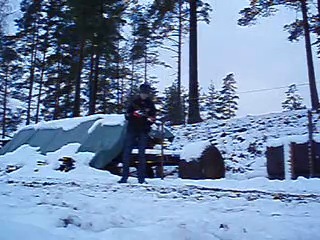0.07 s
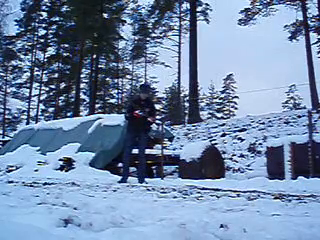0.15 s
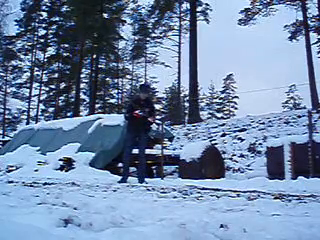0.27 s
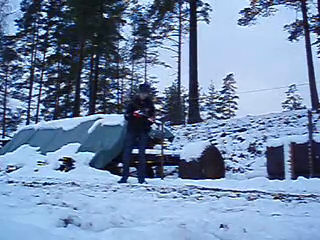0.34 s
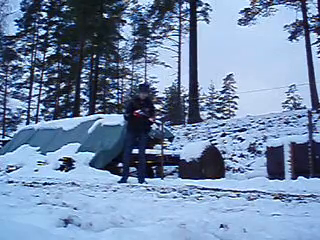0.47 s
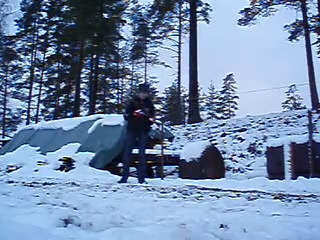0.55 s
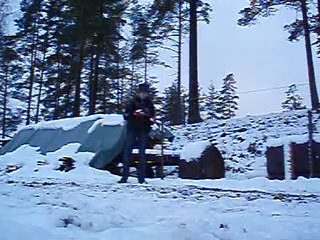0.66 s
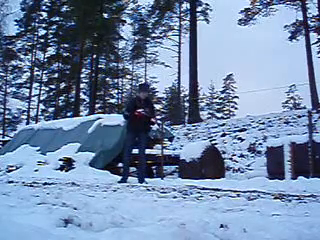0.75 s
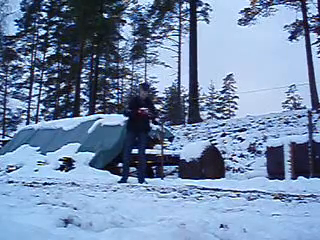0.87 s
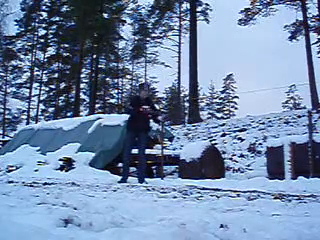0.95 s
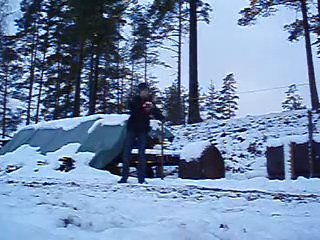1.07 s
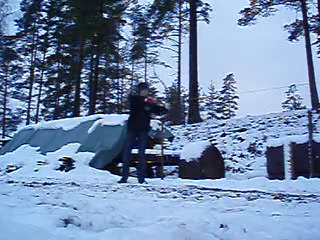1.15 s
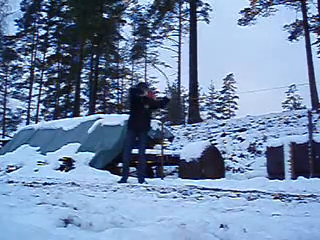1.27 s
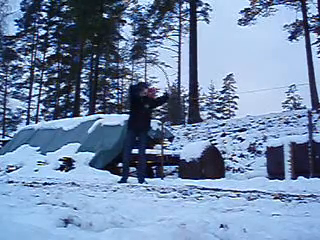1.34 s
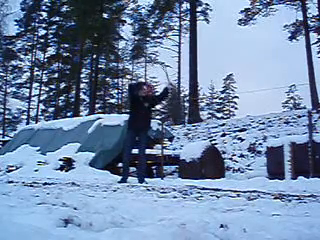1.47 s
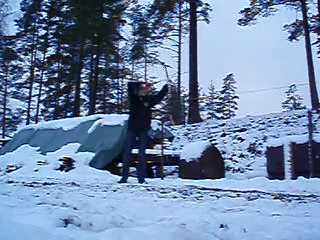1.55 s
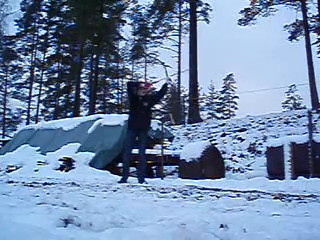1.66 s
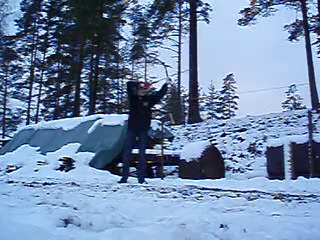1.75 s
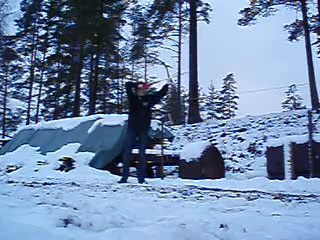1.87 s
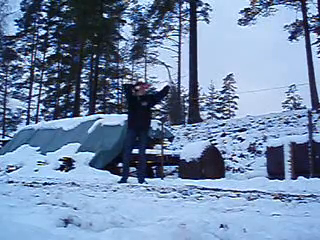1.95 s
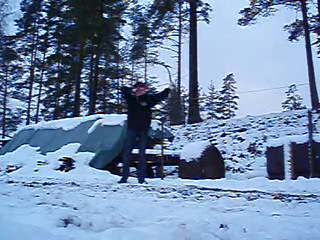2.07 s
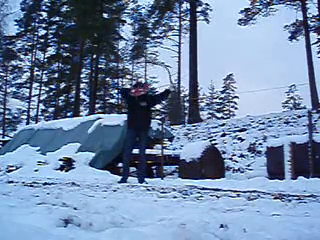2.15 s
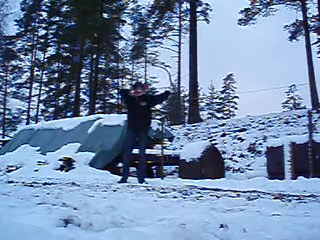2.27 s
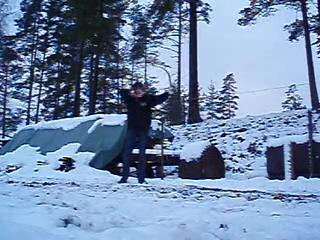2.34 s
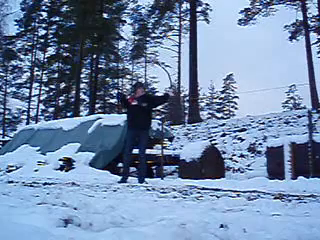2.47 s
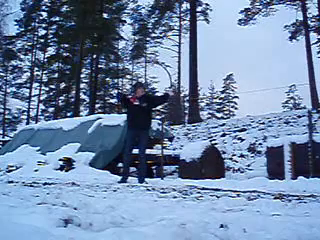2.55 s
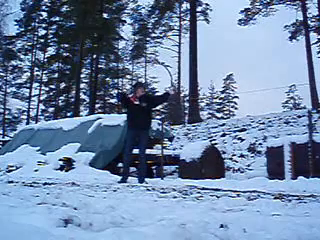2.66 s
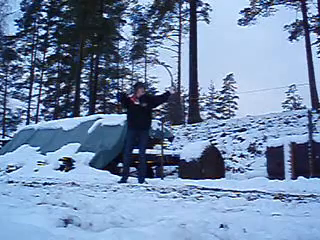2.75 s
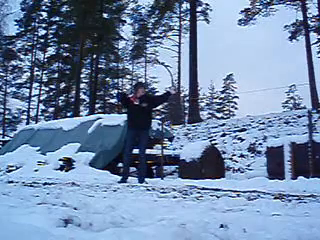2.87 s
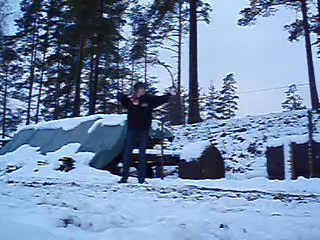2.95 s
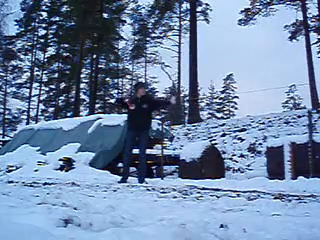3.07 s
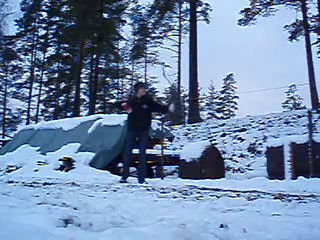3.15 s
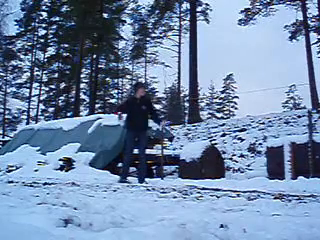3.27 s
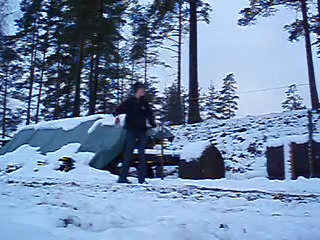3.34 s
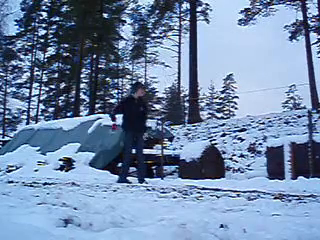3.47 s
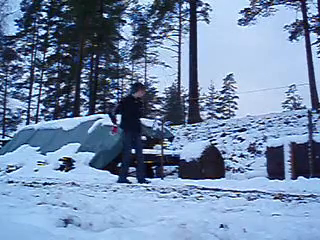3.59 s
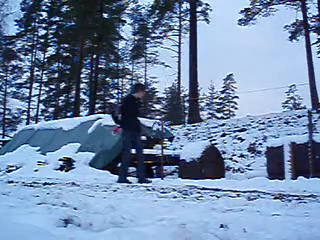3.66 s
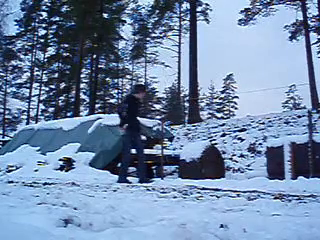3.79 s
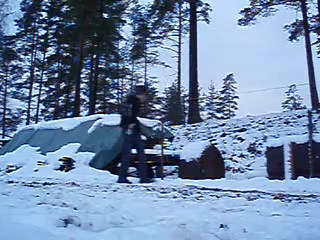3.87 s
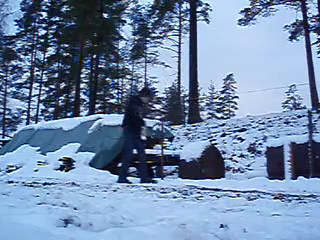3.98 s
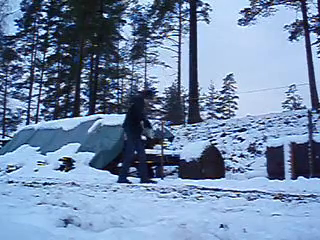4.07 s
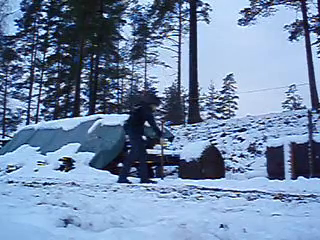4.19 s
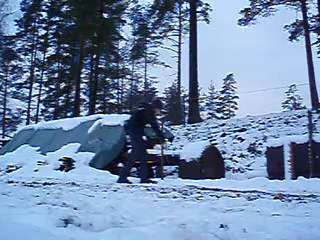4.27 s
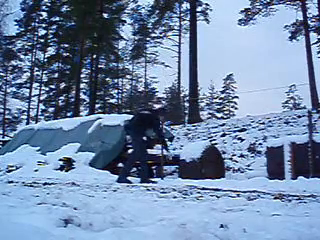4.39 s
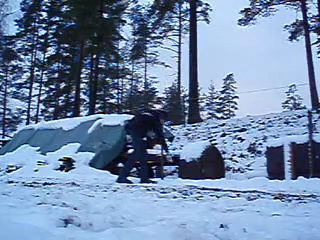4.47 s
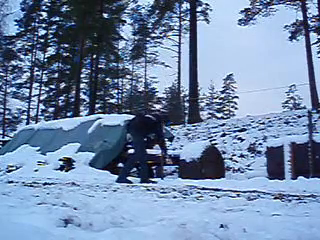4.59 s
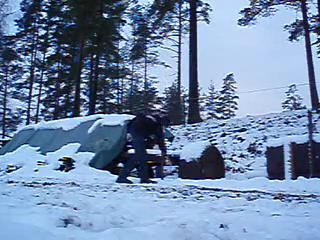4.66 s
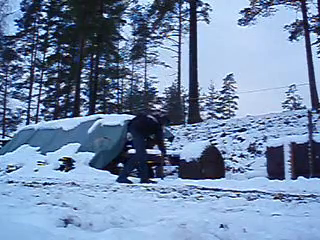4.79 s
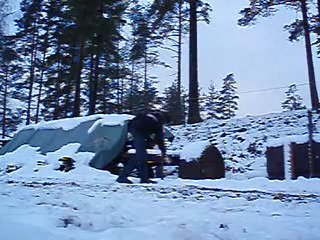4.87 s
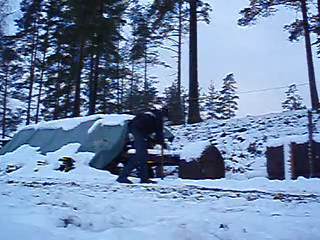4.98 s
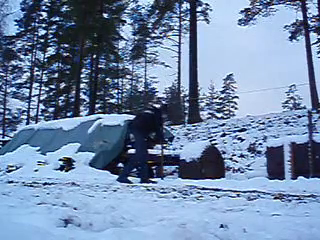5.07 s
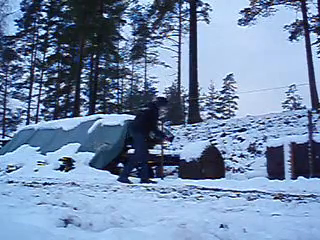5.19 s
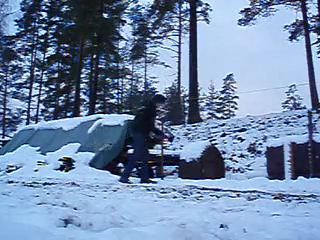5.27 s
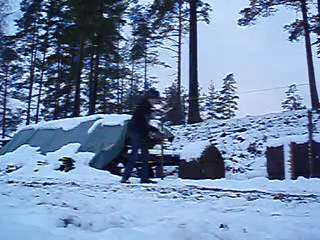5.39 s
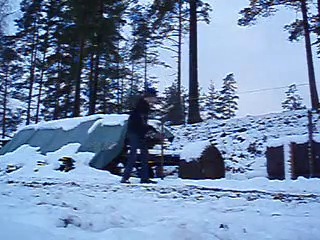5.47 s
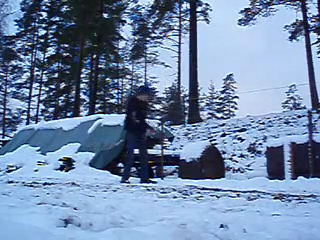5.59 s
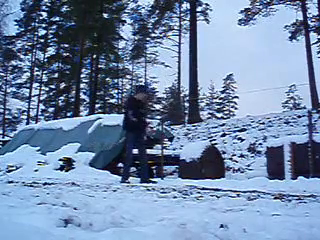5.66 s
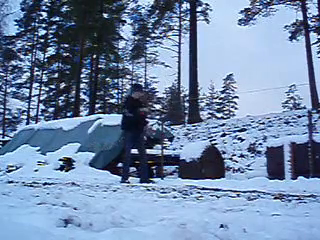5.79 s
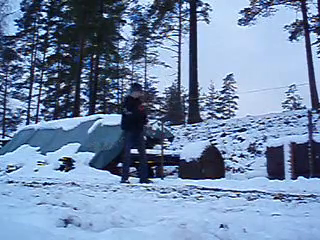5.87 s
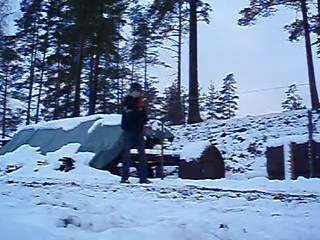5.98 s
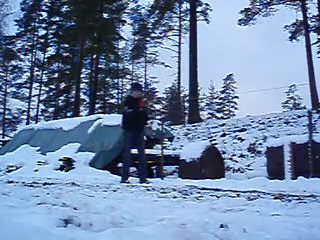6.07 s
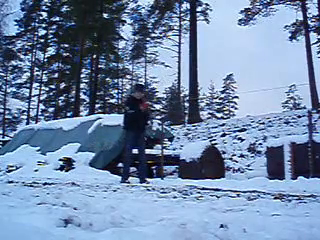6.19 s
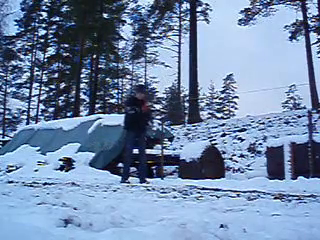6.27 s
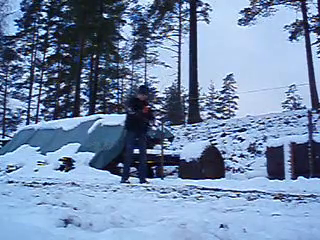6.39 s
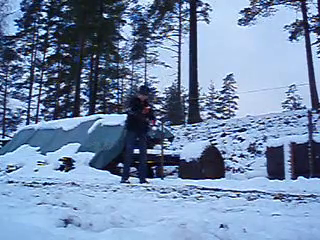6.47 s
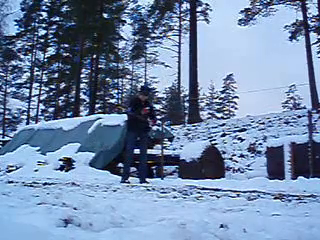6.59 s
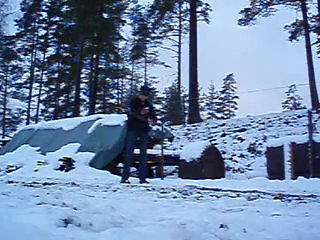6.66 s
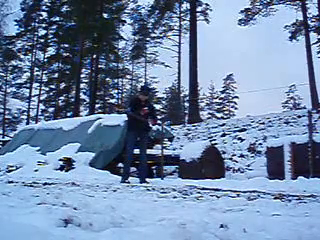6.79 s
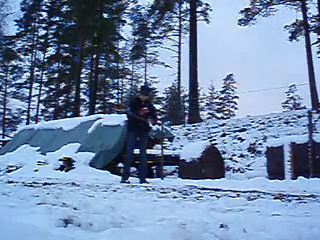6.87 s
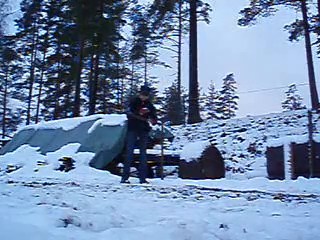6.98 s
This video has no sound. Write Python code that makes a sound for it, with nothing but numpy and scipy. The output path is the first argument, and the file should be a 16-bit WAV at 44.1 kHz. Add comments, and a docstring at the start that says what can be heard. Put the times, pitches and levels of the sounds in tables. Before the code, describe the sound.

Outdoor archery shot: bright string slap with short fluttering hum, a solid thud half a second later, then scattered muted handling knocks over grainy hiss.

```python
"""An archer shoots one arrow in a snowy forest clearing: the bow slaps, rings and hums, the arrow thuds home.
Bow, knocking gear and target are damped sine waves; scrapes, buzz and air are coloured noise.
Wind buffets a small camera, as lumpy low noise and single pushes; trees, a shed and a slope send echoes.
The camera keeps 8000 samples a second in 8 bits, which makes a steady grainy hiss and mirrors the treble."""
import sys
import numpy as np
from scipy import signal
from scipy.fft import rfft, irfft
from scipy.io import wavfile

SR = 44100
rng = np.random.default_rng(int(sys.argv[2]) if len(sys.argv) > 2 else 0)


def transcribe(u):
    """Save the signal u as a 16-bit wav file named by the first command-line argument.

    u: samples, shape (n,) or (channels, n), limited to [-1, 1]; the rate is SR.
    q: integer samples, one column per channel.
    """
    v = np.clip(np.atleast_2d(u).T, -1, 1)
    q = np.round(v * 32767).astype(np.int16)
    wavfile.write(sys.argv[1], SR, q)


N = 310002  # length in samples


def amp(db):
    """Decibels to amplitude factor."""
    return 10 ** (np.asarray(db) / 20)


def read(points, hz):
    """Read a curve of (frequency, value) points along a logarithmic frequency axis."""
    f, value = np.transpose(points)
    return np.interp(np.log(hz + 1), np.log(f + 1), value)


def add(mix, s, sound):
    """Lay a sound into the mix at s seconds, cut off at the end."""
    part = mix[round(s * SR):][:len(sound)]
    part += sound[:len(part)]


def lowpass(x, order, hz):
    """Butterworth treble cut."""
    return signal.sosfilt(signal.butter(order, hz, fs=SR, output="sos"), x)


def noise(colour):
    """Noise of rms 1 with the given spectrum, falling away towards 6 kHz."""
    level_db = read(colour + [(6000, -86)], np.fft.rfftfreq(N, 1 / SR))
    x = irfft(rfft(rng.standard_normal(N)) * amp(level_db), N)
    return x / x.std()


def blows(rows, glide_share=.6, rise_share=.3):
    """Damped waves with a soft start; the pitch slides from the first value towards the last."""
    out = np.zeros(N)
    for s, db, first_hz, last_hz, ring_ms in rows:
        u = np.arange(round(SR * ring_ms / 125)) / SR * 1000 / ring_ms  # time in ring lengths, up to 8
        hz = last_hz + (first_hz - last_hz) * np.exp(-u / glide_share)
        shape = (1 - np.exp(-u / rise_share)) * np.exp(-u)
        wave = np.sin(2 * np.pi * np.cumsum(hz) / SR)
        add(out, s, amp(db) * shape / shape.max() * wave)
    return out


def ticks(rows, rise_share=.22):
    """Short blows of steady pitch."""
    return blows([(s, db, hz, hz, ms) for s, db, hz, ms in rows], rise_share=rise_share)


# spectrum of the background air: (frequency [Hz], relative level [dB per Hz])
AIR_COLOUR = [(20, -5.5), (60, -0.5), (150, 0), (300, -6), (600, -8.5), (1200, -13.5), (2500, -15.5),
              (4000, -16)]
AIR_DB = -47  # rms


def air():
    """Steady coloured noise under everything."""
    return amp(AIR_DB) * noise(AIR_COLOUR)


# wind strength around which the lumps swing: (time [s], rms level [dB])
WIND_LEVEL = [(0.0, -52), (0.51, -53), (0.84, -50), (1.66, -55), (1.9, -55), (2.11, -53), (2.27, -46),
              (2.35, -46), (2.64, -48), (2.84, -49), (3.13, -45), (3.35, -52), (3.85, -53), (4.66, -60),
              (5.17, -52), (5.5, -56), (5.91, -55), (6.03, -57), (6.28, -56), (6.48, -53), (6.77, -59),
              (7.03, -59)]
# spectrum of the wind pressure: (frequency [Hz], relative level [dB per Hz])
WIND_SPECTRUM = [(15, -11.5), (35, -2), (60, -0.5), (100, -6), (200, -18), (400, -40)]
# single gusts pushing on the microphone: (time [s], envelope peak [dB], first pitch [Hz])
GUSTS = [(.205, -33, 100), (.223, -31.5, 125), (1.282, -35, 70), (2.205, -31, 108), (2.395, -33.5, 68),
         (2.927, -24.5, 68), (3.13, -26.5, 72), (3.17, -30.5, 72), (3.24, -31, 68), (3.866, -35.5, 66),
         (5.203, -31, 74)]
BUFFET_SAG, BUFFET_TURNS = .8, 1.05  # share the pitch sinks towards; ring length in cycles of the first pitch


def wind():
    """Lumpy low pressure noise on the microphone follows the gusts; single pushes ring for about a cycle."""
    s, db = np.transpose(WIND_LEVEL)
    strength_db = np.interp(np.arange(N) / SR, s, db)
    lumps = noise([(1, -1), (12, 5.5), (30, -16), (60, -60)])
    pushes = blows([(at, peak, hz, BUFFET_SAG * hz, 1000 * BUFFET_TURNS / hz) for at, peak, hz in GUSTS])
    return amp(strength_db + 2.5 * lumps) * noise(WIND_SPECTRUM) + pushes


# knocks of gear, a quick high ring over an opposed low one, levels before the treble cut; # the row at 4.2620 s
# is a strong return of the 4.2430 s knock from the shed wall: # (time [s], high level [dB], high pitch [Hz],
# high ring [ms], low level [dB], low pitch [Hz])
GEAR_KNOCKS = [(1.3849, -27.5, 380, 3, -32.5, 152), (1.3926, -28, 293, 2.4, -23.5, 192),
               (4.2430, -28.5, 260, 1.9, -27, 170), (4.2620, -31.5, 260, 1.9, -30, 160),
               (4.3500, -17, 250, 2, -18, 130), (5.714, -19.5, 505, 3, -30, 90),
               (5.7235, -40, 500, 3, -28, 110), (6.2901, -30, 477, 2.4, -30, 210),
               (6.3783, -17.5, 493, 1.8, -18, 201), (6.5040, -16.5, 480, 1.5, -15.5, 176)]
LOW_LAG_S, LOW_RING_MS, KNOCK_HZ = .00064, 4.2, 846  # delay and ring of the low part; treble limit of both


def knocks():
    """Each blow starts two rings in opposite directions, the low one late; soft contact keeps them dull."""
    high = ticks([row[:4] for row in GEAR_KNOCKS], rise_share=.45)
    low = ticks([(s + LOW_LAG_S, db, hz, LOW_RING_MS) for s, *_, db, hz in GEAR_KNOCKS], rise_share=.45)
    return lowpass(high - low, 4, KNOCK_HZ)


# how long the forest rings: (frequency [Hz], time to fall 60 dB [s])
FOREST_DECAY = [(100, 0.24), (300, 0.13), (1000, .25), (2500, .4), (4000, 0.36)]


def trees(x, gap_s):
    """Scattered echoes from trunks and sheds: a noise tail after a gap, each band dying at its own speed."""
    hz, t, z = signal.stft(rng.standard_normal(SR // 2), SR, nperseg=256)
    fading = z * amp(-60 * t / read(FOREST_DECAY, hz)[:, None])
    tail = signal.istft(fading, SR, nperseg=256)[1]
    tail = np.append(np.zeros(round(gap_s * SR)), tail / np.linalg.norm(tail))
    return signal.fftconvolve(x, tail)[:N]


SHED_S, SHED_DB, SHED_HZ = .019, -13.5, 900  # delay, level, treble limit


def shed(x):
    """One dull copy comes back from the shed wall."""
    dull = lowpass(x, 1, SHED_HZ)
    return amp(SHED_DB) * np.append(np.zeros(round(SHED_S * SR)), dull)[:N]


# scrapes and faint clicks without a pitch: (time [s], starting level [dB], decay time [ms])
SCRAPE_BURSTS = [(1.538, -39, 2.5), (2.4936, -34, 2.6), (2.4967, -21, 1.2), (2.4993, -23, 1),
                 (2.5108, -11, 1.9), (3.3745, -33, 1.25), (3.388, -37, 1.7)]
# spectrum of the scrapes: (frequency [Hz], relative level [dB per Hz])
SCRAPE_SPECTRUM = [(300, -18), (1000, -6), (2000, -3.5), (3500, 3.5)]


def scrapes():
    """Bursts of bright noise that die quickly."""
    level = np.zeros(N)
    for s, db, decay_ms in SCRAPE_BURSTS:
        add(level, s, amp(db) * np.exp(-np.arange(SR // 20) / SR * 1000 / decay_ms))
    return level * noise(SCRAPE_SPECTRUM)


# loudest slaps of string and arrow on the bow: (time [s], envelope peak [dB], pitch [Hz], ring [ms])
BOW_SLAPS = [(2.5068, -11, 2730, 4), (2.5085, -8, 3050, 1.5), (2.5106, .5, 3545, 2.6),
             (2.5116, -7.5, 1600, 1)]


def slaps():
    """String and arrow strike the bow: very short damped waves."""
    return ticks(BOW_SLAPS)


# sinking rings of the limbs: (envelope peak before the blow level [dB], first pitch [Hz], last pitch [Hz], ring [ms])
LIMB_RINGS = [(-13, 195, 190, 5), (-24, 106, 98, 12)]
# the limbs thump once, and a weaker copy comes back from the shed 20 ms later: (time [s], blow level [dB])
LIMB_THUMPS = [(2.5100, 0), (2.5300, -5)]


def limb_thumps():
    """Each thump of the limbs gives dull rings whose pitch sinks."""
    return -blows([(s, blow_db + db, *ring) for s, blow_db in LIMB_THUMPS for db, *ring in LIMB_RINGS])


# modes of bow limbs and riser: (pitch [Hz], level before the soft start [dB], time to fall 60 dB [s])
BOW_MODES = [(1184, -41, .18), (1325, -23.5, 0.12), (2040, -30.5, 0.14), (2264, -28, .12),
             (2420, -19, 0.058), (2694, -25, 0.22), (2820, -30, .12), (2925, -19, 0.11),
             (3140, -28.5, 0.064), (3344, -29, 0.065), (3590, -29, 0.11)]
TAP_TURNS, TAP_HZ, TAP_DB_PER_OCTAVE = 2.8, 3000, 10  # ring in cycles; small taps favour modes above TAP_HZ


def taps(s, db):
    """Each tap catches one mode of the bow by chance, held short by the contact."""
    pick, size = rng.random((len(s), 2)).T
    hz = np.array(BOW_MODES)[(pick * len(BOW_MODES)).astype(int), 0]
    level_db = db + 6 * (size - .5) + TAP_DB_PER_OCTAVE * np.log2(hz / TAP_HZ)
    return ticks(np.transpose([s, level_db, hz, 1000 * TAP_TURNS / hz]))


CHATTER_S, CHATTER_DB, CHATTER_SPREAD_S, CHATTER_FADE_DB_PER_S = 2.511, -9, .004, 800


def chatter():
    """Ten loose taps follow the blow, weaker the later they come."""
    late = rng.exponential(CHATTER_SPREAD_S, size=10)
    return taps(CHATTER_S + late, CHATTER_DB - CHATTER_FADE_DB_PER_S * late)


STRING_HOME_S = 2.5115  # the string slams home and strikes the limbs
RATTLE_DB, RATTLE_S = -22, .028  # buzz: level before the soft start, decay time
# spectrum of the buzz: (frequency [Hz], relative level [dB per Hz])
RATTLE_SPECTRUM = [(200, -18), (400, -8), (800, -14), (1500, -10), (2700, 0), (4000, 0)]


def bow_ring():
    """After the blow the modes of the bow ring on and the whole bow buzzes."""
    t = np.arange(SR // 2) / SR
    modes = sum(amp(db - 60 * t / t60) * np.sin(2 * np.pi * hz * t) for hz, db, t60 in BOW_MODES)
    buzz = amp(RATTLE_DB) * np.exp(-t / RATTLE_S) * noise(RATTLE_SPECTRUM)[:len(t)]
    out = np.zeros(N)
    add(out, STRING_HOME_S, (modes + buzz) * (1 - np.exp(-t / .003)))
    return out


# fundamental, then the overtone in its upright and sideways planes:
# (level before rise and flutter [dB], time to fall 60 dB [s])
STRING_HUM = [(-31.5, .75), (-28.5, .4), (-37.5, .65)]
TAUT_HZ, SLACK_HZ, SLACKEN_S = 273, 217, .155  # the pitch sinks as the string slackens
HUM_RISE_S, BEAT_HZ, BEAT_NULL_S = .01, 11.5, .107  # the two planes oppose each other at BEAT_NULL_S


def string():
    """Two partials flutter on one falling pitch; the overtone beats between two planes."""
    t = np.arange(SR // 2) / SR
    hz = SLACK_HZ + (TAUT_HZ - SLACK_HZ) * np.exp(-t / SLACKEN_S)
    turn = 2 * np.pi * np.cumsum(hz) / SR
    beat = 2 * np.pi * BEAT_HZ * (t - BEAT_NULL_S)
    first, upright, sideways = (amp(db - 60 * t / t60) for db, t60 in STRING_HUM)
    flutter = [noise([(1, 2.5), (30, 0), (80, -36), (200, -70)])[:len(t)] for _ in range(2)]
    fundamental = amp(2.5 * flutter[0]) * first * np.sin(turn)
    overtone = upright * np.sin(2 * turn) - sideways * np.sin(2 * turn - beat)
    hum = fundamental + amp(1.3 * flutter[1]) * overtone
    out = np.zeros(N)
    add(out, STRING_HOME_S, (1 - np.exp(-t / HUM_RISE_S)) * hum)
    return out


BOUNCE_S, BOUNCE_EVERY_S, BOUNCE_SCATTER_S, BOUNCE_DB, BOUNCE_FADE_DB = 2.5222, .008, .004, -15, 3.3


def bounces():
    """The string bounces on: four weakening clusters of five scattered taps."""
    bounce = np.repeat(np.arange(4), 5)
    s = BOUNCE_S + BOUNCE_EVERY_S * bounce + BOUNCE_SCATTER_S * rng.random(len(bounce))
    return taps(s, BOUNCE_DB - BOUNCE_FADE_DB * bounce)


# the shaft whirs away: (time [s], envelope peak [dB], first pitch [Hz], last pitch [Hz], ring [ms])
ARROW_WHIR = [(2.575, -43, 880, 780, 14)]


def arrow():
    """A soft swell of sinking pitch as the shaft flies off."""
    return blows(ARROW_WHIR, glide_share=1.5, rise_share=1.5)


HIT_S = 2.9617  # the arrow tip lands
# crack of the target face: (pitch [Hz], envelope peak before the blow level [dB])
FACE_MODES = [(480, -28), (880, -17), (1850, -13), (2600, -24), (3500, -17.5)]
FACE_LAG_TURNS, FACE_RING_TURNS = .8, .9  # each mode starts late and decays within about a cycle


def face(s, blow_db):
    """One jar of the target face."""
    return -ticks([(s + FACE_LAG_TURNS / hz, blow_db + db, hz, 1000 * FACE_RING_TURNS / hz)
                   for hz, db in FACE_MODES])


# dull rings of the target body: (envelope peak [dB], first pitch [Hz], last pitch [Hz], ring [ms])
BODY_RINGS = [(-12, 185, 140, 9.5), (-24, 115, 110, 12)]
THUD_LAG_S = .0021  # the body answers late


def target_thud():
    """The body of the target gives low rings whose pitch sinks."""
    return blows([(HIT_S + THUD_LAG_S, *ring) for ring in BODY_RINGS], rise_share=.1)


SHUDDER_S, SHUDDER_EVERY_S, SHUDDER_DB, SHUDDER_FADE_DB = .0145, .012, -15.5, 3


def shudder():
    """The stuck shaft whips and jars the face three more times, each weaker."""
    return sum(face(HIT_S + SHUDDER_S + k * SHUDDER_EVERY_S, SHUDDER_DB - k * SHUDDER_FADE_DB)
               for k in range(3))


SLOPE_S, SLOPE_DB = .082, -19.5  # delay, level


def slope(x):
    """One echo comes back from the far slope."""
    return amp(SLOPE_DB) * np.roll(x, round(SLOPE_S * SR))


def scene():
    """Gear, shot and hit with their echoes, over wind and air."""
    gear = knocks()
    dull_gear = lowpass(gear, 2, 220)  # mostly the low ring carries to the trees
    gear_echo = amp(-9) * trees(dull_gear, .011) + shed(gear)

    scratch, thumps = scrapes(), limb_thumps()
    rings = slaps() + chatter() + bow_ring() + bounces()
    near_echo = trees(amp(-22) * rings + amp(-7) * scratch + amp(-9) * thumps, .008)
    far_echo = amp(-10) * trees(scratch, .055)
    shot = rings + scratch + thumps + string() + arrow() + near_echo + far_echo

    crack, thud = face(HIT_S, 0), target_thud()
    hit_echo = trees(amp(-12) * crack + amp(-13) * thud, .004) + amp(-13) * trees(crack, .072)
    hit = crack + thud + shudder() + slope(crack + thud) + hit_echo
    return (shot + hit + gear + gear_echo + wind() + air())[None]


RATE, STEPS = 8000, 128  # samples per second; 8-bit levels on each side of zero
INPUT_HZ, EDGE_HZ = 4100, 12850  # treble limits before and after sampling


def record(dry):
    """Input filter, 8-bit samples that overload, are rounded down and held in steps; then the band limit."""
    smooth = signal.oaconvolve(dry[0], signal.firwin(255, INPUT_HZ, fs=SR), "same")
    samples = np.interp(np.arange(N * RATE // SR + 1) / RATE, np.arange(N) / SR, smooth)
    levels = np.clip(np.floor(samples * STEPS), -STEPS, STEPS - 1) / STEPS
    held = levels[np.arange(N) * RATE // SR]  # the steps mirror the spectrum around 4, 8 and 12 kHz
    band_limit = signal.firwin(511, EDGE_HZ, window=("kaiser", 9), fs=SR)
    return signal.oaconvolve(held, band_limit, "same")[None]


dry = scene()
out = record(dry)
transcribe(out)
```